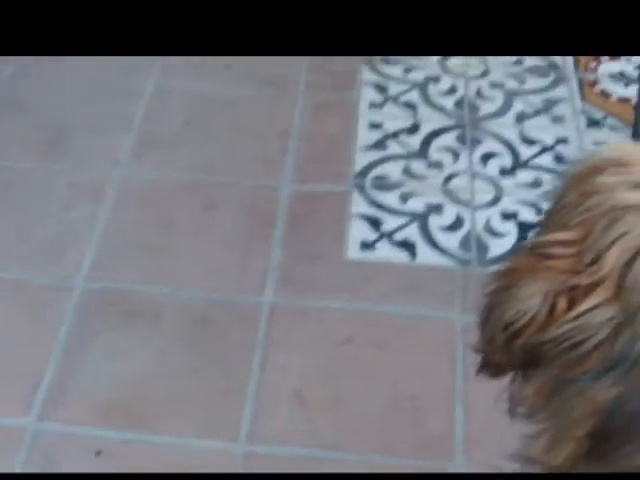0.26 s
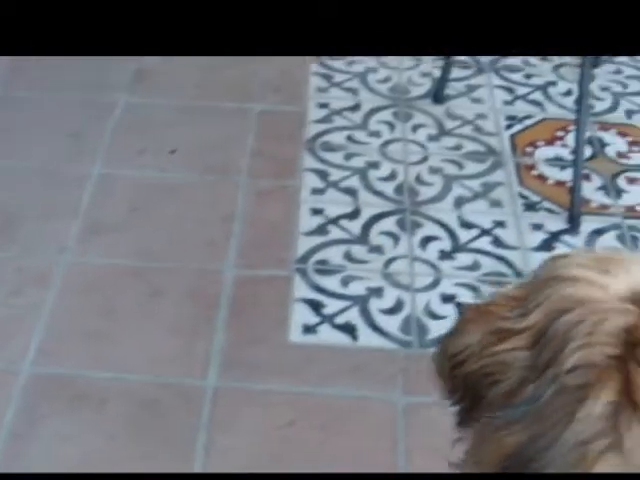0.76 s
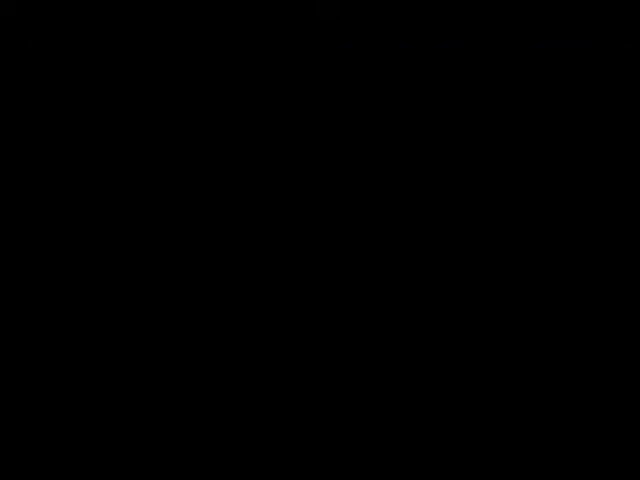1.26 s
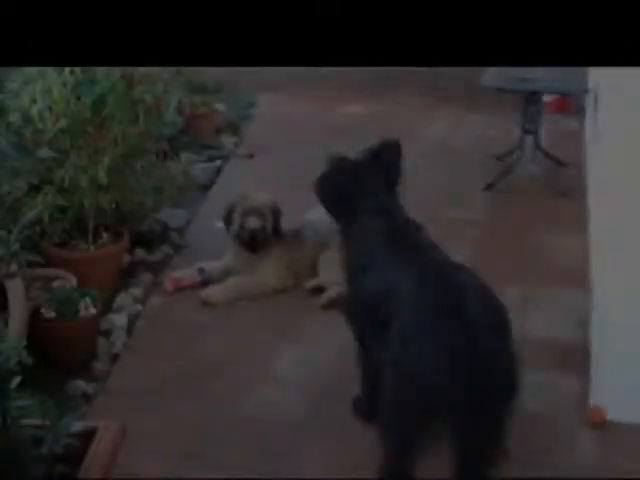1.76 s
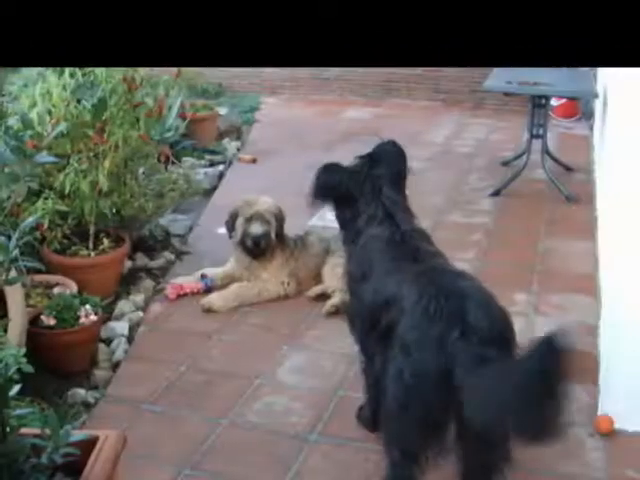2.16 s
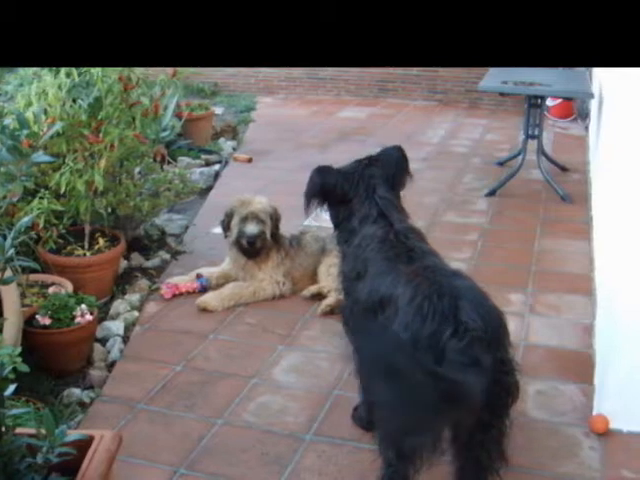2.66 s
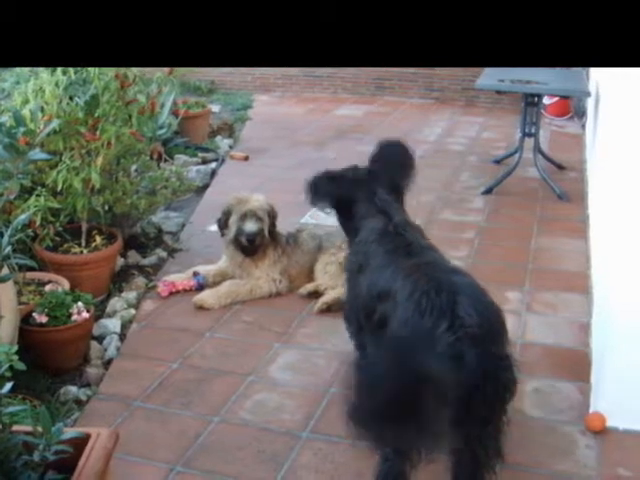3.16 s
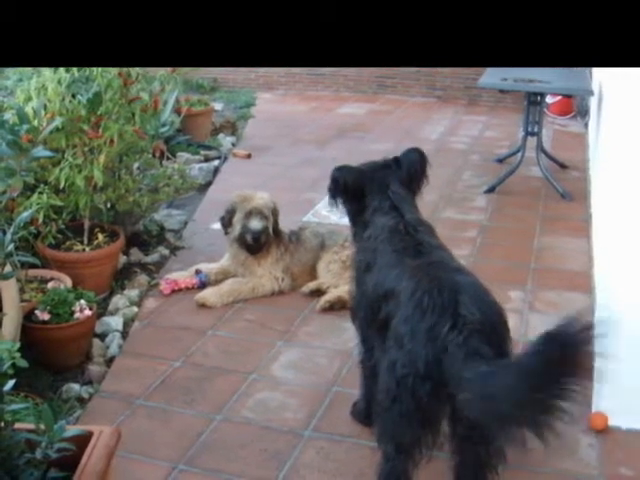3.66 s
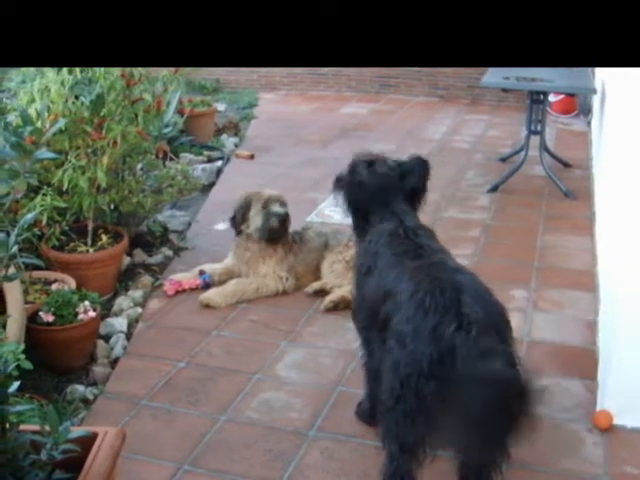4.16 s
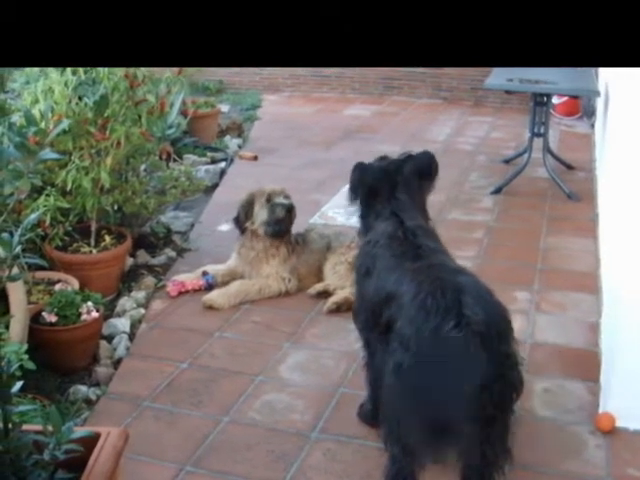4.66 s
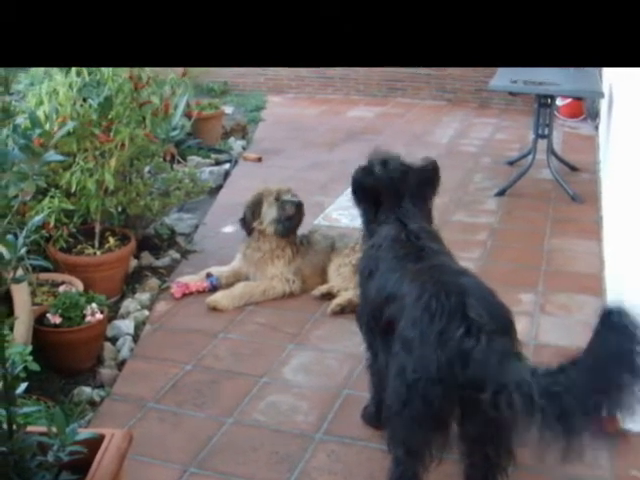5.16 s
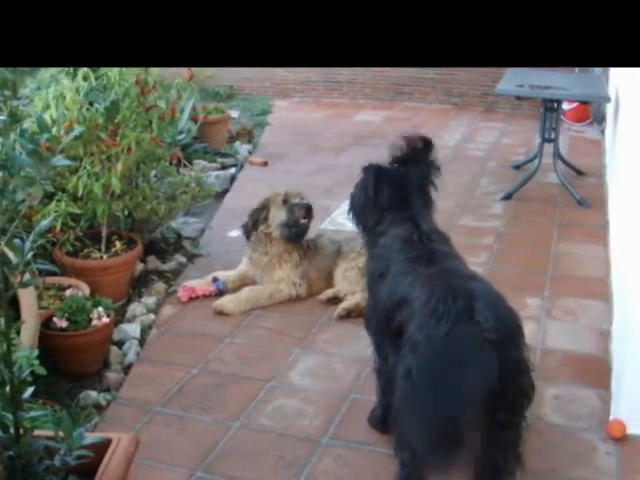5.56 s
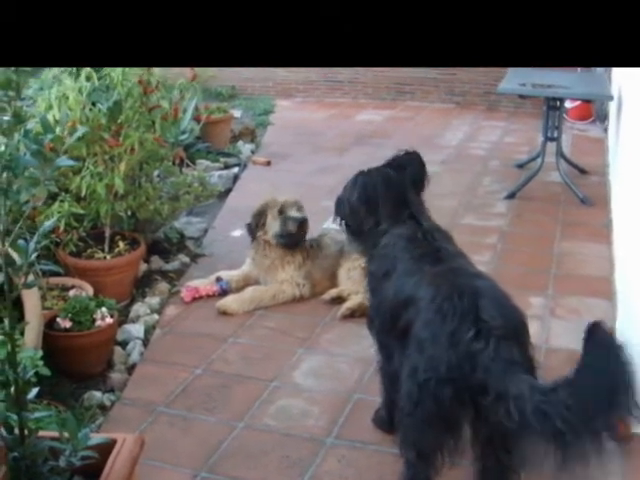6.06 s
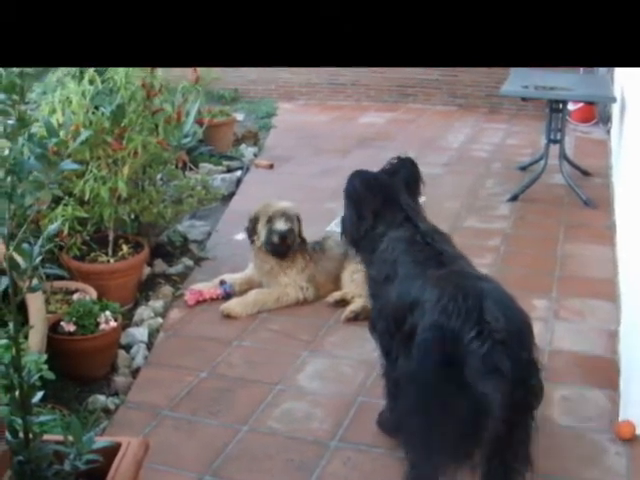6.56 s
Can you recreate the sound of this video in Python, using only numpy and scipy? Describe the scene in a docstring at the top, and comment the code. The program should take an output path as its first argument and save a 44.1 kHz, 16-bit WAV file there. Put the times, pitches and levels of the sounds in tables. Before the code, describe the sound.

A big dog barks four times, well spaced, on an echoing tiled terrace, following close camera clicks, with thin raspy bird notes between.

```python
"""A large dog gives four single deep barks on a tiled terrace: rough fold pulses through throat, mouth and chest.
Tiles and house walls return distinct echoes of dog and bird, the garden a diffuse tail.
Before the barks a hand-held camera clicks (pushes on a ringing case) and rumbles (decaying low noise).
Soft scuffs are humps of noise; a small bird whistles gliding notes with a fluttering rasp.
Behind lie a soft hush and a faint treble hiss with the flicker of audio compression, both coloured noise."""
import sys
import numpy as np
from scipy import signal
from scipy.fft import rfft, irfft, next_fast_len
from scipy.io import wavfile
from scipy.ndimage import uniform_filter1d, minimum_filter1d, map_coordinates

SR = 44100
rng = np.random.default_rng(int(sys.argv[2]) if len(sys.argv) > 2 else 0)


def to_wav(sig):
    """Store sig (one row per channel, or 1-D mono) as 16-bit WAV at the path in sys.argv[1].

    Samples outside -1..1 are clipped; the rate is SR.
    """
    pcm = np.clip(np.atleast_2d(sig), -1, 1) * 32767
    pcm = np.round(pcm).astype(np.int16)
    wavfile.write(sys.argv[1], SR, pcm.T)  # frames by channels


N = 299698


def amp(db):
    """Decibels to gain."""
    return 10 ** (np.asarray(db) / 20)


def unit(x):
    """x at rms 1."""
    return x / np.sqrt(np.mean(x ** 2) + 1e-20)


def steady(x, span_s=0.024):
    """x held near rms 1 from moment to moment."""
    power = np.abs(uniform_filter1d(x ** 2, int(span_s * SR)))
    return x / np.sqrt(power + 1e-12)


def along(points, hz):
    """(Hz, value) points read on a log frequency axis."""
    f, v = np.transpose(points)
    return np.interp(np.log(hz + 1), np.log(f + 1), v)


def hump(t, centre, width):
    """A bell curve of height 1, down to 1/e at one width."""
    return np.exp(-((t - centre) / width) ** 2)


def ramp(t, centre, width):
    """A smooth step from 0 to 1."""
    return .5 + .5 * np.tanh((t - centre) / width)


def wobble(rate_hz, size):
    """A smooth random curve with rate_hz knots a second."""
    knots = rng.standard_normal(size + 4)
    return map_coordinates(knots, [np.arange(size) * rate_hz / SR], mode="mirror")


def coloured(x, spectrum):
    """x through a causal minimum-phase filter with the (Hz, dB) gains."""
    m = 2 * next_fast_len(len(x) // 2 + 4096)
    gains = amp(along(spectrum, np.fft.rfftfreq(m, 1 / SR)))
    # fold the cepstrum onto positive time
    cepstrum = irfft(np.log(gains))
    cepstrum[1:m // 2] *= 2
    cepstrum[m // 2 + 1:] = 0
    return irfft(rfft(x, m) * np.exp(rfft(cepstrum)))[:len(x)]


def noise(spectrum, size):
    """Coloured noise of rms 1."""
    return unit(coloured(rng.standard_normal(size), spectrum))


def add(track, start_s, x):
    """Mix x into the track from start_s."""
    part = track[max(round(start_s * SR), 0):][:len(x)]
    part += x[:len(part)]


def dog():
    """Each bark starts as a rough woof, brightens as the jaw opens, slips in pitch and sags, the mouth fading."""
    # barks: attack_end_s, length_s, throat_db, attack_s, rise_db (over the attack), throat_sag_db, start_hz,
    # end_hz, slip_at_s, roughness (0-1), period_doubling (0-1), jaw_gape (0-1), mouth_db, chest_db
    bark_rows = [(1.353, 0.17, -13.5, .046, 31.5, 11, 613.5, 490, .04, .32, 0.1, .98, -14.5, -30.5),
                 (2.621, 0.18, -12.5, .008, 34, 11.5, 605.8, 503.4, .03, 0.4, 0.26, 0.8, -15.5, -32.5),
                 (3.875, 0.095, -14.5, 0.028, 11, 18, 602.8, 621.3, 0.0377, 0.32, 0.28, 0.74, -18, -29),
                 (4.892, 0.19, -14, .01, 38, 13.5, 608.3, 514, .125, .42, 0.6, 0.72, -15, -33.5)]
    release_s, release_db = .04, 23.5
    pitch_slide_s = .01
    onset_rough, closing_rough = 0.63, .12  # before the jaw opens; added as the bark runs out
    woof_db, woof_at_s, woof_width_s = 2.5, 0.012, 0.0058  # the first push of air
    jaw_at_s, jaw_open_s = .043, 0.012
    # as the jaw snaps open the mouth flares and the throat gives way
    flare_mouth_db, flare_throat_db, flare_width_s = 1, -5, 0.014
    mouth_shut_db, mouth_open_s, mouth_sag_db = -7.5, 0.011, 13.5
    # the dip's place and width are shares of the bark's length
    chest_dip_db, chest_dip_at, chest_dip_width, chest_sag_db = 11.5, 0.39, 0.23, 9.5
    out = np.zeros(N)
    for (s, length_s, throat_db, attack_s, rise_db, sag_db, start_hz, end_hz, slip_at_s,
         rough, doubling, gape, mouth_db, chest_db) in bark_rows:
        t = np.arange(-attack_s, length_s + release_s, 1 / SR)
        progress = np.clip(t / length_s, 0, 1)
        opening = ramp(t, jaw_at_s, jaw_open_s)
        flare = hump(t, jaw_at_s, flare_width_s)
        hz = start_hz + (end_hz - start_hz) * ramp(t, slip_at_s, pitch_slide_s)
        roughness = onset_rough + (rough - onset_rough) * opening + closing_rough * progress ** 2
        throat, mouth, chest = voice(hz, roughness, doubling, gape * opening)

        woof = woof_db * hump(t, woof_at_s, woof_width_s)
        throat = throat * amp(throat_db + woof + flare_throat_db * flare - sag_db * progress ** 2)
        late = mouth_shut_db * np.exp(-np.maximum(t, 0) / mouth_open_s)
        mouth = mouth * amp(mouth_db + late + flare_mouth_db * flare - mouth_sag_db * progress)
        dip = chest_dip_db * hump(progress, chest_dip_at, chest_dip_width)
        chest = chest * amp(chest_db - dip - chest_sag_db * progress)

        corners_s = [-attack_s, 0, length_s, length_s + release_s]
        gate = amp(np.interp(t, corners_s, [-rise_db, 0, 0, -release_db]))
        gate = gate * signal.windows.tukey(len(t), .03)
        add(out, s - attack_s, gate * (throat + mouth + chest))
    return out


def voice(hz, rough, doubling, jaw, woof_air=0.53, throat_air=0.2, mouth_air=1.0, chest_air=1.0, flutter_db=4.75):
    """The folds heard through throat, mouth and chest; the throat flutters more as the jaw opens."""
    # resonances, jaw nearly shut and wide open: freq_hz, gain_db
    throat_shut = [(200, -34), (350, -16.5), (470, -0.5), (580, -2.5), (660, 6), (750, 2.5), (950, -16),
                   (1500, -77)]
    throat_open = [(200, -57.5), (330, -30.5), (420, 0), (490, 4), (580, 2), (720, -20), (950, -19),
                   (1500, -82)]
    # upper resonances that the mouth lets out, likewise: freq_hz, gain_db
    mouth_shut = [(500, -43.5), (760, -11.5), (890, 4.5), (1020, 2), (1190, 6.5), (1400, -1), (1780, -5.5),
                  (2080, -22.5), (2350, -18.5), (2750, -60.5), (5000, -52), (9000, -80)]
    mouth_open = [(500, -61), (760, -5.5), (980, 5), (1120, -9), (1330, -0.5), (1490, 1), (1640, -13),
                  (1760, 1), (1980, -7.5), (2120, -18.5), (2400, -12.5), (2750, -33.5), (3150, -36),
                  (3420, -31.5), (3900, -44.5), (5300, -38.5), (6500, -56.5), (9000, -69.5)]
    # the chest's low growl: freq_hz, gain_db
    chest_gains = [(50, -20.5), (130, -13), (230, -1.5), (320, 5), (400, -3), (600, -60.5)]
    pulses, rush = folds(hz, rough, doubling)
    flutter = amp(flutter_db * jaw * wobble(98, len(hz)))
    throat_source = pulses + (woof_air + throat_air * jaw) * rush
    throat = flutter * tract(throat_source, throat_shut, throat_open, jaw)
    mouth = tract(pulses + mouth_air * rush, mouth_shut, mouth_open, jaw)
    chest = steady(coloured(pulses + chest_air * rush, chest_gains))
    return throat, mouth, chest


def folds(hz, rough, doubling, jitter=0.044, shimmer_db=2, tilt_db=-2.0, rasp_db=3):
    """Vocal fold pulses, uneven from one to the next by doubling, and air rushing in puffs every second cycle."""
    size, rough = len(hz), np.clip(rough, 0, 1)
    jittered_hz = hz * (1 + jitter * np.sqrt(rough) * wobble(202.2, size))
    phase = 2 * np.pi * np.cumsum(jittered_hz) / SR
    orders = np.arange(1, 33)[:, None] / 2
    # period doubling puts lines halfway between the harmonics; tilt_db is per octave
    sizes = np.where(orders % 1, doubling, 1) * amp(tilt_db * np.log2(orders))
    pulses = (sizes * np.cos(orders * phase)).sum(0) * amp(shimmer_db * wobble(154, size))
    puffs = unit((1 + 0.41 * np.cos(phase / 2)) * amp(rasp_db * wobble(300.5, size)))
    # per harmonic spacing the rush is as strong as one harmonic
    rush = rng.standard_normal(size) * np.sqrt(SR / 4 / hz) * puffs
    return np.sqrt(1 - rough) * pulses, np.sqrt(rough) * rush


def tract(source, shut, wide, jaw):
    """The source through resonances that shift as the jaw opens, in three cross-faded steps."""
    hz = np.geomspace(50, 12000, 200)
    mixed = 0
    for step in (0, .5, 1):
        gains_db = (1 - step) * along(shut, hz) + step * along(wide, hz)
        share = np.maximum(1 - 2 * np.abs(np.clip(jaw, 0, 1) - step), 0)
        mixed = mixed + share * coloured(source, np.column_stack([hz, gains_db]))
    return steady(mixed)


def walls(x):
    """Tiles and house walls return a few distinct copies, added to the direct sound."""
    # echoes: delay_s, level_db
    echoes = [(.0052, -14.5), (.0127, -7), (.0231, -16), (.041, -13.5), (.092, -18.5), (.155, -32)]
    out = x.copy()
    for delay_s, db in echoes:
        add(out, delay_s, amp(db) * x)
    return out


def garden(x, delay_s=.012):
    """A diffuse tail in which each frequency dies at its own speed."""
    # decay: freq_hz, t60_s
    decay_points = [(150, .4), (380, 0.81), (500, 0.96), (700, 0.61), (1500, 0.92), (4000, 0.17),
                    (10000, 0.33)]
    hz, t, z = signal.stft(rng.standard_normal(SR), SR, nperseg=256)
    decay = amp(-60 * t / along(decay_points, hz)[:, None])
    tail = signal.istft(z * decay, SR, nperseg=256)[1]
    delayed = np.pad(x, (int(delay_s * SR), 0))
    return signal.fftconvolve(delayed, tail / np.linalg.norm(tail))[:N]


def clicks(rattle=0.039, rattle_t60_s=.024, crack_t60_s=0.011, crack_gain=0.56):
    """Each contact is one sharp push on the plastic case, which rattles and rings; a low cut-off dulls it."""
    # contacts: start_s, level_db, contact_cutoff_hz, crack_db (before crack_gain, relative to level_db)
    contacts = [(0.062, -5.5, 2360, -39), (0.1521, -3.5, 4170, -41), (0.4803, -7, 1210, -12),
                (0.508, -12, 1070, -35.5), (.518, -27, 2600, -19.5), (0.5243, -28, 2000, -28),
                (0.5279, -17.5, 4500, -18), (0.527, -24, 5000, -17), (.5336, -31, 2600, -8)]
    # the case's response: freq_hz, gain_db
    case_gains = [(100, -20.5), (500, -14), (750, 4), (900, -4), (1400, 0), (1780, 7), (2150, -6.5),
                  (2500, -1.5), (3200, -0.5), (3800, 0.5), (4700, -10), (7000, -13), (9000, -26),
                  (12500, -32.5)]
    # the case's ringing modes: freq_hz, level_db (relative to the snap's peak), t60_s
    case_modes = [(750, -27, 0.063), (1400, -24, 0.032), (3840, -25, 0.017)]
    # the high crack's relative spectrum: freq_hz, level_db (per Hz)
    crack_spectrum = [(1500, -34.5), (4000, 1.5), (6000, -2.5), (8000, -6), (10000, -2.5), (11000, -11),
                      (12800, -24.5)]
    out, t = np.zeros(N), np.arange(SR // 10) / SR
    for s, db, contact_hz, crack_db in contacts:
        push = (t == 0) + rattle * rng.standard_normal(len(t)) * amp(-60 * t / rattle_t60_s)
        b, a = signal.butter(2, min(contact_hz, SR / 3), fs=SR)
        snap = signal.lfilter(b, a, coloured(push, case_gains))
        snap = snap / np.abs(snap).max()
        ring = sum(amp(mode_db - 60 * t / t60_s) * np.sin(2 * np.pi * hz * t) for hz, mode_db, t60_s in case_modes)
        crack = crack_gain * amp(crack_db - 60 * t / crack_t60_s) * noise(crack_spectrum, len(t))
        add(out, s, amp(db) * (snap + ring + crack))
    return out


def handling(rise_s=.012):
    """Each shift of the hand makes the camera's body rumble and settle: low noise that decays."""
    # shifts: start_s, level_db, t60_s
    shifts = [(0.17, -35, 0.41), (0.484, -40.5, 0.31), (0.59, -44, 0.43), (0.706, -50, 0.26)]
    # relative spectrum: freq_hz, level_db (per Hz)
    rumble_spectrum = [(20, -8), (55, 3.5), (100, 0), (180, -13), (500, -69)]
    out, t = np.zeros(N), np.arange(SR // 2) / SR
    for s, db, t60_s in shifts:
        envelope = np.minimum(t / rise_s, 1) * amp(db - 60 * t / t60_s)
        add(out, s, envelope * noise(rumble_spectrum, len(t)))
    return out


def scuffs(skirt_db=-17):
    """Brief soft rubs of paws and fur, each noise in a broad hump around its own frequency."""
    # rubs: centre_s, half_length_s, level_db, centre_hz
    rubs = [(0.433, 0.016, -43, 428), (1.277, 0.059, -43, 175.6), (1.287, 0.03, -46.5, 1423),
            (3.691, 0.054, -51, 129.7), (3.763, 0.055, -45, 750), (3.842, 0.032, -38, 145),
            (4.58, 0.026, -49.5, 590)]
    out = np.zeros(N)
    for s, half_s, db, hz in rubs:
        t = np.arange(-2 * half_s, 2 * half_s, 1 / SR)
        spectrum = [(hz / 4, skirt_db), (hz, 0), (hz * 2.46, skirt_db), (min(hz * 12, SR / 2), -55)]
        add(out, s + t[0], amp(db) * hump(t, 0, half_s) * noise(spectrum, len(t)))
    return out


def bird(swell_power=0.25, tremble_db=2.0, rasp_hz=280, partials_db=-21.5):
    """High, mostly falling slurs and lower arched notes; a fast pitch flutter makes some notes raspy."""
    # notes: start_s, length_s, pitch_hz, fall_octaves, level_db, rasp (0-1)
    slurs = [(1.194, .075, 3875, .3, -48.5, 0.6), (1.8, 0.159, 4220, .04, -57.5, 0.83),
             (2.82, 0.08, 4050, .12, -59, .8), (2.998, 0.082, 3880, 0.3, -47.5, 0.5),
             (3.915, .095, 3905, 0.31, -56.5, 1), (5.19, .064, 3670, 0.11, -59, 0.66),
             (5.417, .069, 3910, 0.43, -48.5, 0.9), (6.248, 0.095, 3910, -0.15, -56.5, 1),
             (6.336, .09, 3440, 0.04, -45, 0.5)]
    arches = [(1.283, .046, 2960, 0, -51, 0), (1.926, 0.079, 2886, 0.071, -52, 0.47),
              (2.9, 0.094, 2990, .06, -53.5, 0.53), (3.093, .062, 2935, 0.02, -49, 0.22),
              (4.007, 0.078, 2970, 0, -54.5, .5), (5.253, .092, 3010, .04, -54.5, 0.67),
              (5.497, 0.054, 2907, 0.038, -46.5, 0.2), (6.398, 0.097, 3010, 0.32, -53.5, 0.77)]
    out = np.zeros(N)
    # bow: octaves by which a note's ends lie above its middle
    for notes, bow_octaves in ((slurs, .03), (arches, -0.25)):
        for s, length_s, pitch_hz, fall, db, rasp in notes:
            u = np.linspace(-1, 1, int(length_s * SR))
            glide_hz = pitch_hz * 2 ** (bow_octaves * u ** 2 - fall * u / 2)
            hz = glide_hz + rasp * rasp_hz * wobble(900, len(u))
            phase = 2 * np.pi * np.cumsum(hz) / SR
            # weak partials at half and one and a half times the whistle
            partials = np.sin(phase / 2) + np.sin(phase + phase / 2)
            whistle = np.sin(phase) + amp(partials_db) * partials
            swell = np.abs(np.cos(np.pi * u / 2)) ** swell_power * amp(tremble_db * wobble(130, len(u)))
            add(out, s, amp(db) * swell * np.sqrt(2) * whistle)
    return out


def hush(level_db=-49):
    """A soft outdoor hush: steady noise, weak in the treble."""
    # relative spectrum: freq_hz, level_db (per Hz)
    air_spectrum = [(15, -34.5), (25, -10.5), (55, -2.5), (152, -0.5), (240, -1), (325, -2.5), (378, -3.5),
                    (431, -4), (941, -8), (1330, -8.5), (2980, -17), (3180, -18.5), (3870, -19),
                    (4500, -23), (5850, -35.5), (9900, -120)]
    return amp(level_db) * noise(air_spectrum, N)


def hiss(level_db=-66.5, coder_flicker_db=2.5):
    """A faint treble hiss with the flicker of audio compression: noise whose level varies at random."""
    # relative spectrum: freq_hz, level_db (per Hz)
    hiss_spectrum = [(3500, -17.5), (4600, -10), (5100, 4.5), (5400, -3.5), (6200, -5), (7100, -7),
                     (7550, 0), (7900, -10), (8550, 2), (9100, -6.5), (10000, -12.5), (10600, -17.5),
                     (12200, -13), (12800, -19)]
    flicker = np.tanh(wobble(18, N))
    return amp(level_db + coder_flicker_db * flicker) * noise(hiss_spectrum, N)


def scene():
    """Dog and bird sound through the terrace; all else stays dry."""
    barks, song = dog(), bird()
    tail = garden(amp(-20.0) * barks + amp(-7) * song)
    terrace = walls(barks + song) + tail
    return (terrace + clicks() + handling() + scuffs() + hush() + hiss())[None]


def limiter(x, ceiling_db=-1.7, hold_s=.008):
    """Gain turned down smoothly just around any peaks above the ceiling."""
    hold = int(hold_s * SR)
    needed = np.minimum(1, amp(ceiling_db) / (np.abs(x) + 1e-9))
    held = minimum_filter1d(needed, 2 * hold)
    return x * uniform_filter1d(uniform_filter1d(held, hold), hold)


def record(dry, top_hz=12800):
    """The camera holds down the peaks and keeps nothing above its band limit."""
    m = next_fast_len(N + SR // 2)
    band = np.fft.rfftfreq(m, 1 / SR) < top_hz
    return irfft(rfft(limiter(dry), m) * band, m)[..., :N]


dry = scene()
out = record(dry)
to_wav(out)
```